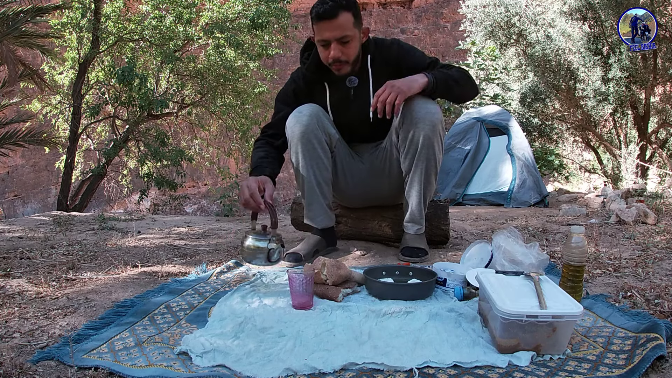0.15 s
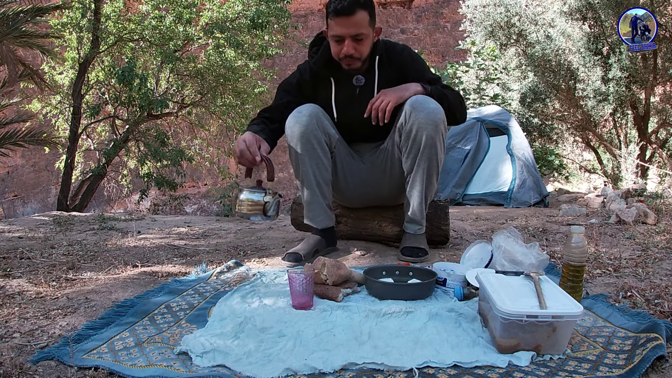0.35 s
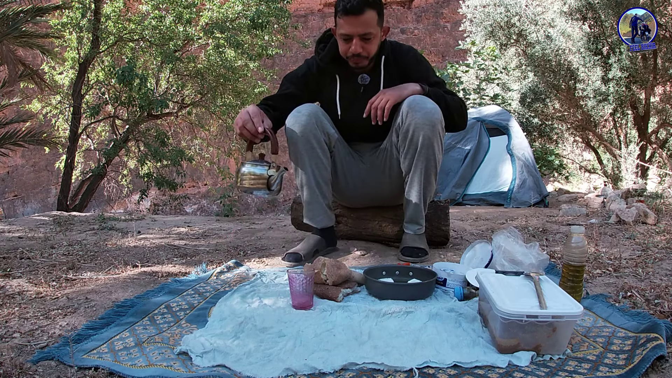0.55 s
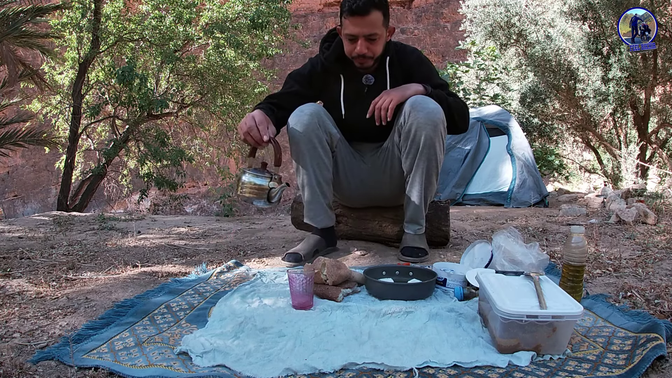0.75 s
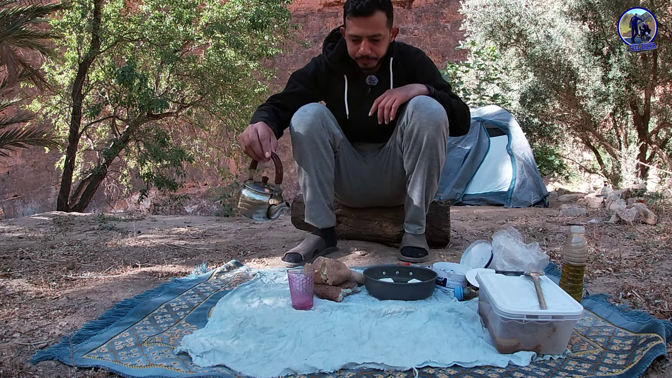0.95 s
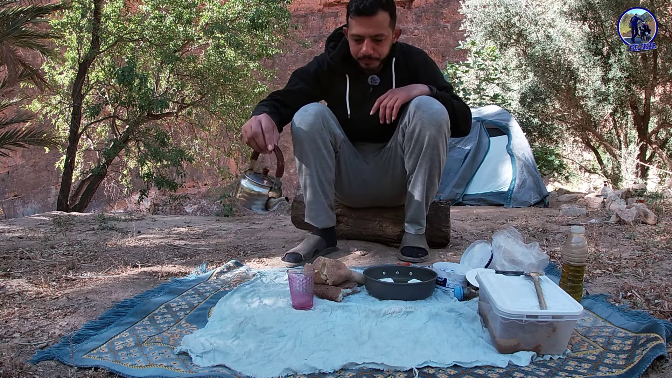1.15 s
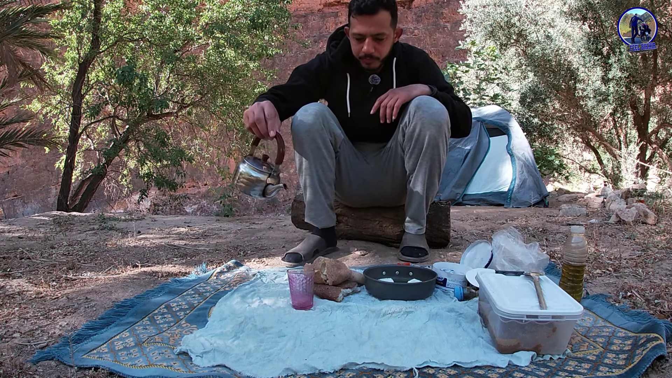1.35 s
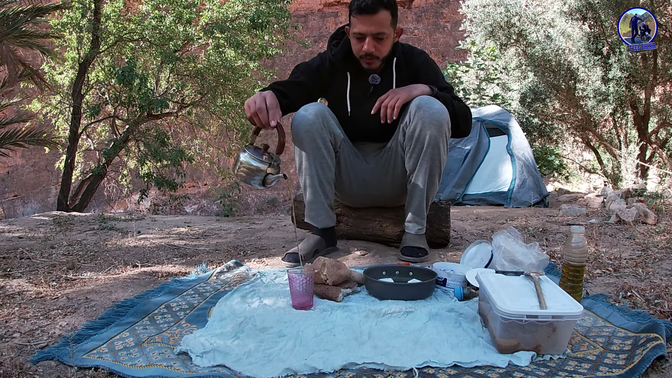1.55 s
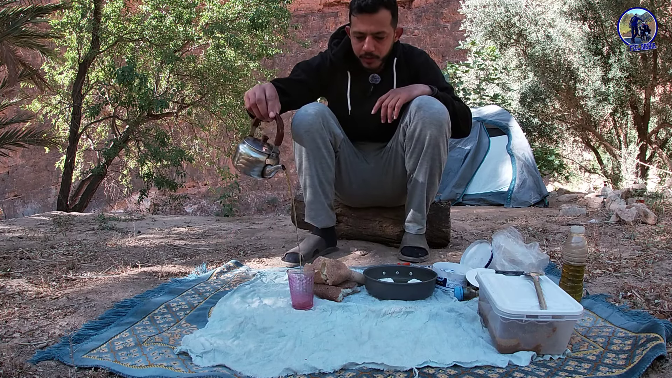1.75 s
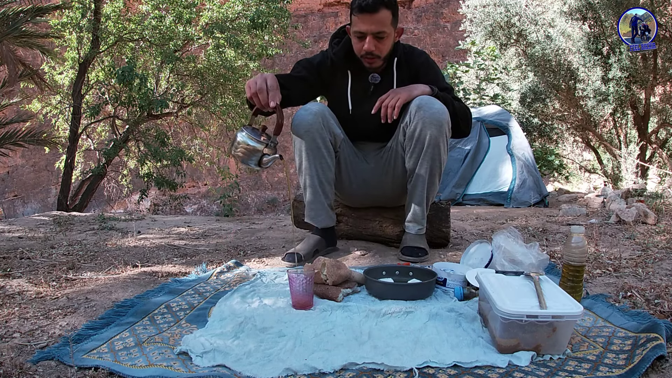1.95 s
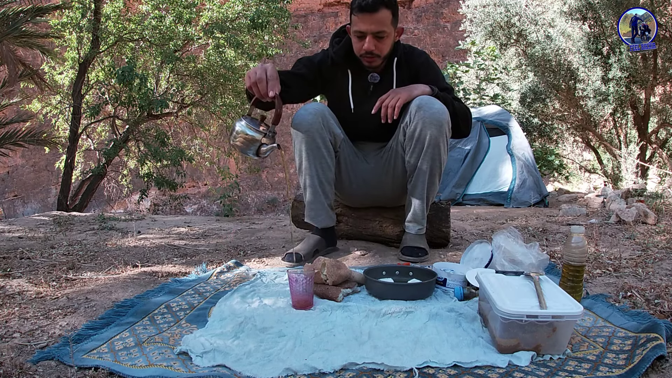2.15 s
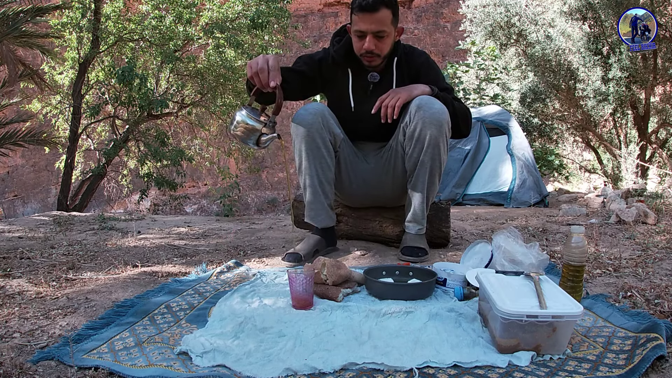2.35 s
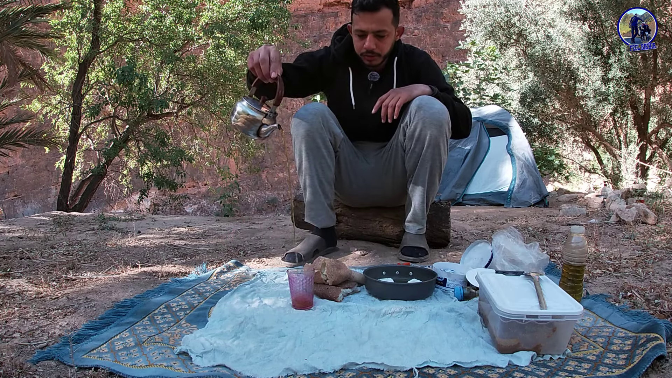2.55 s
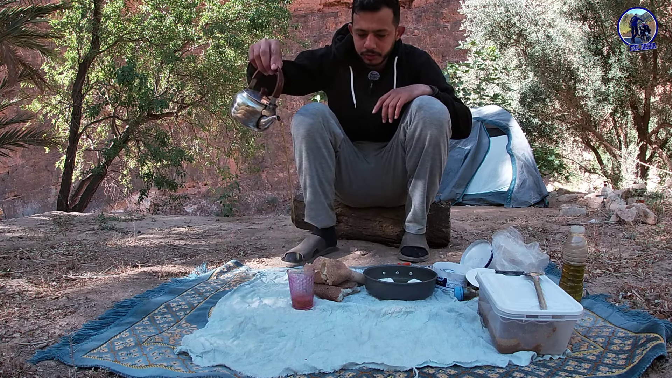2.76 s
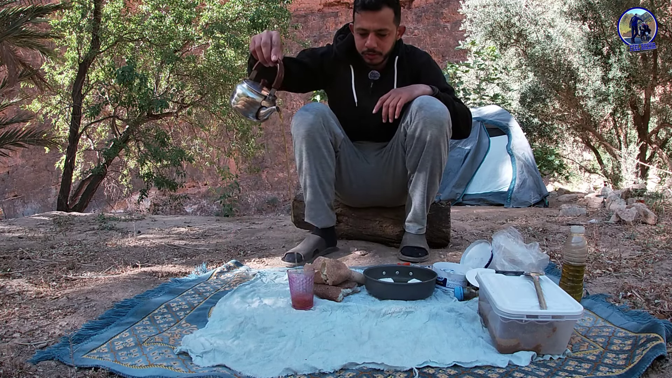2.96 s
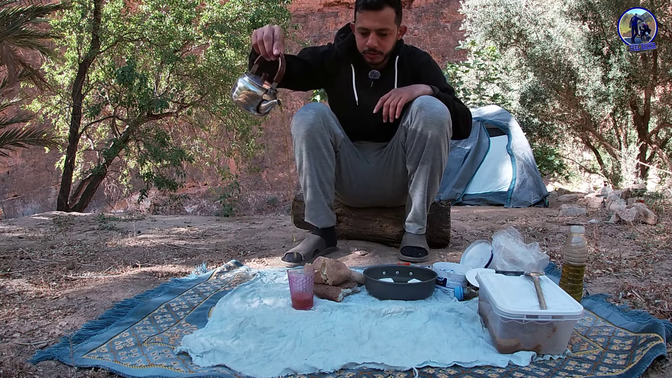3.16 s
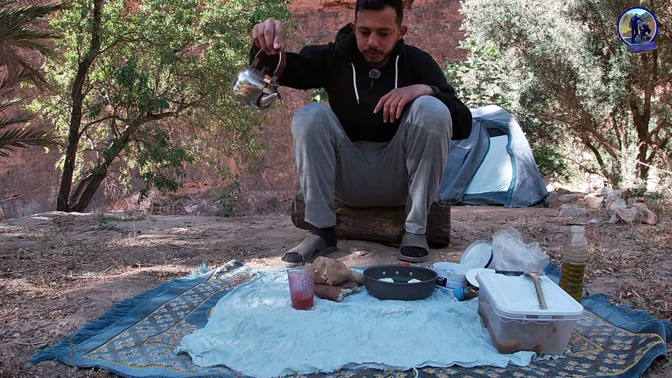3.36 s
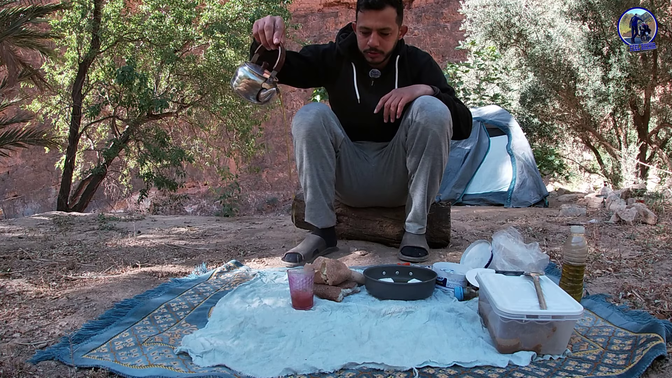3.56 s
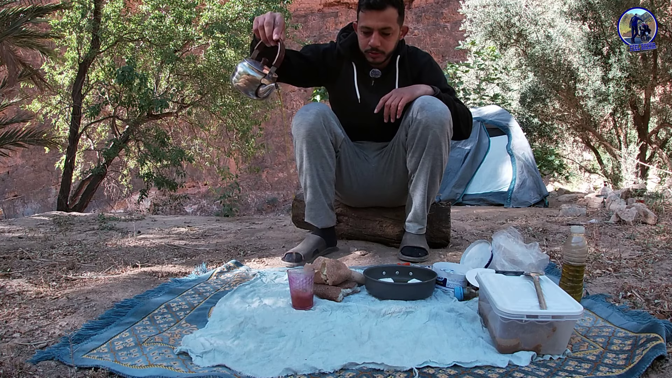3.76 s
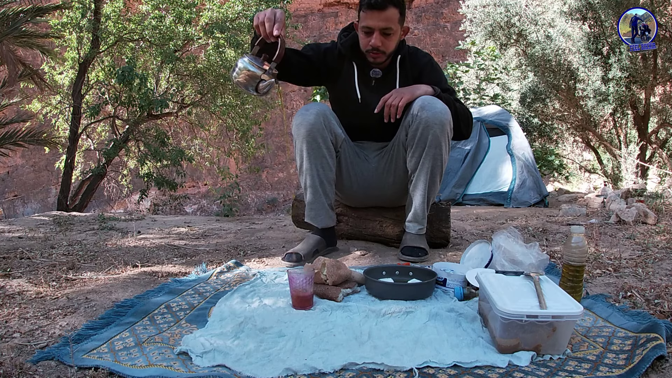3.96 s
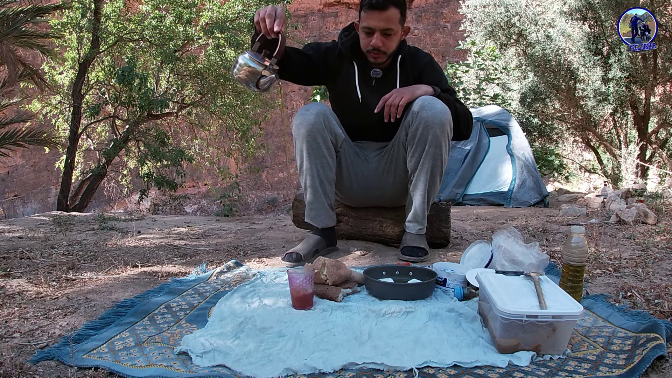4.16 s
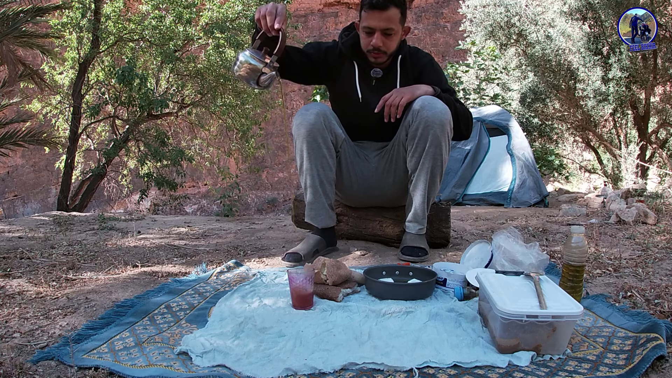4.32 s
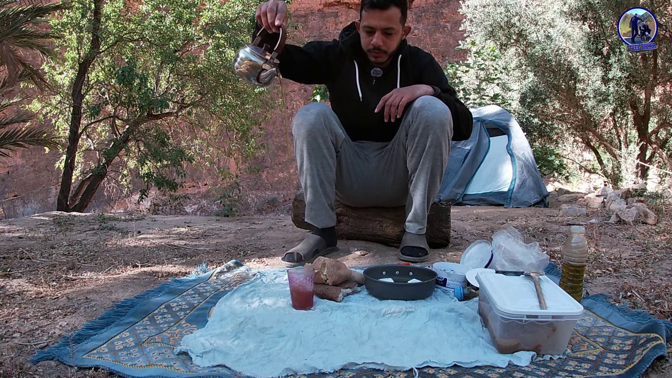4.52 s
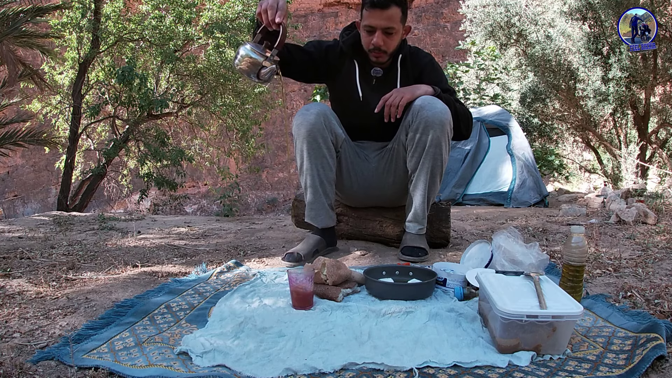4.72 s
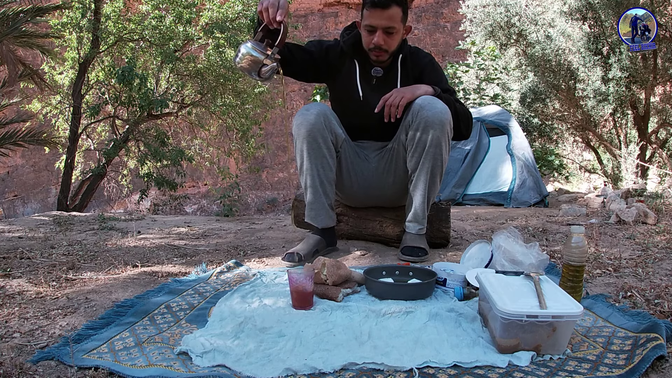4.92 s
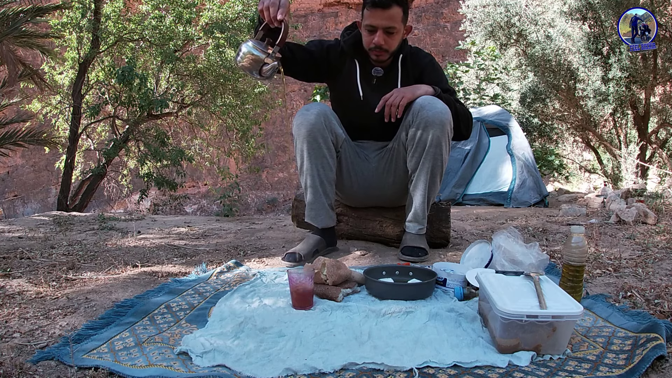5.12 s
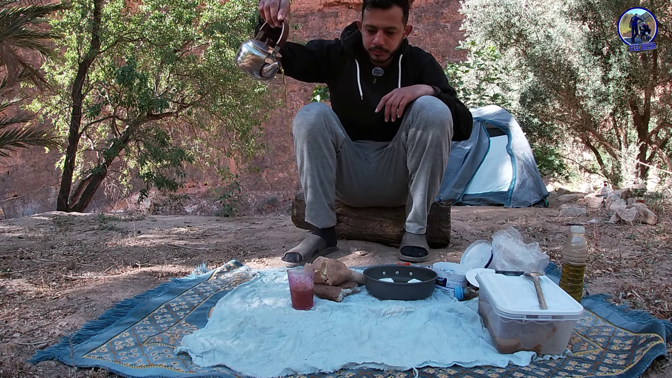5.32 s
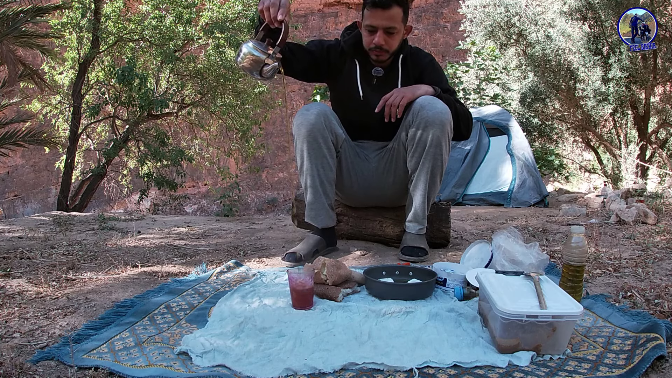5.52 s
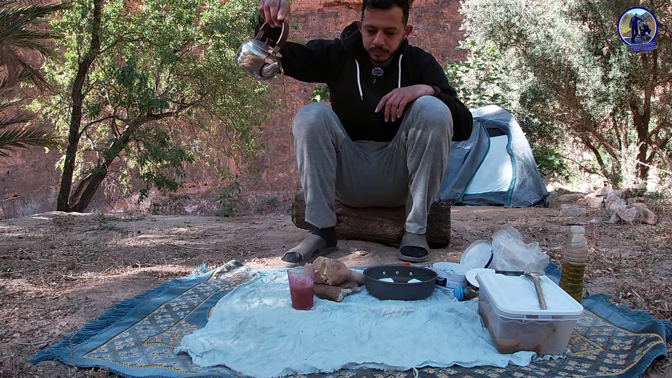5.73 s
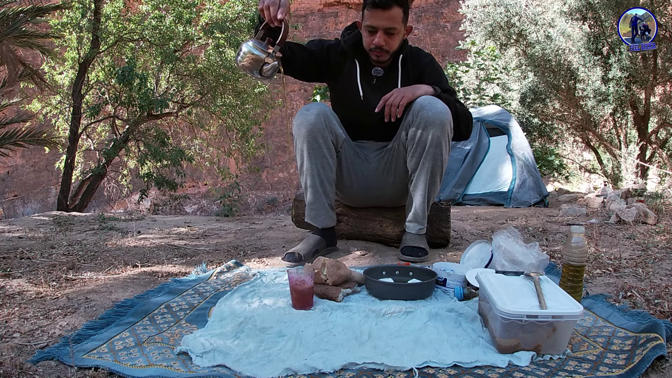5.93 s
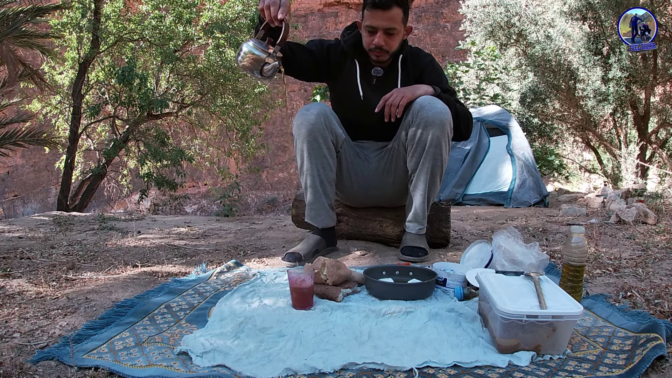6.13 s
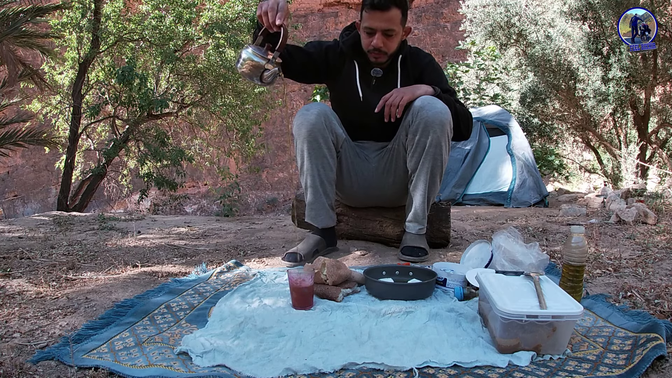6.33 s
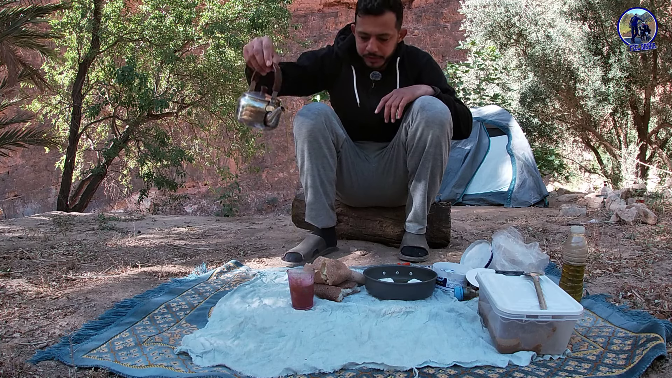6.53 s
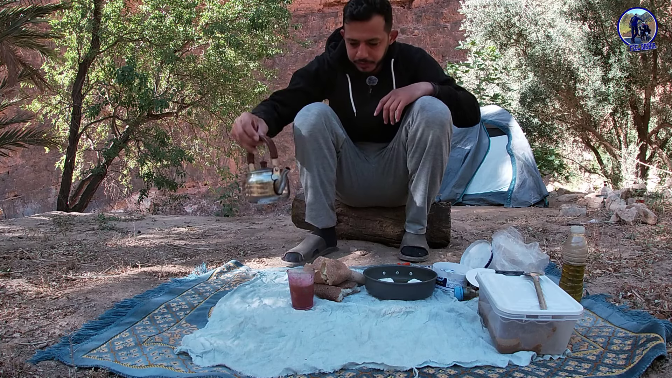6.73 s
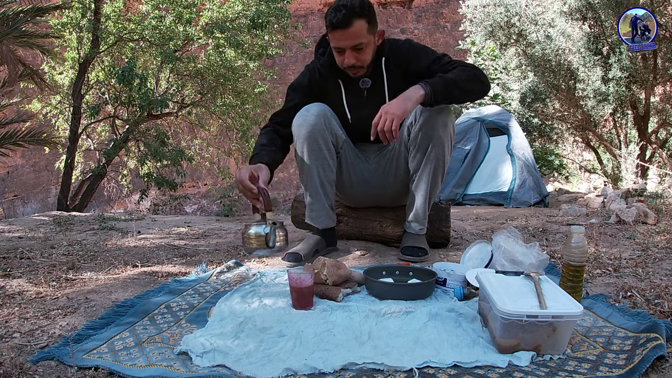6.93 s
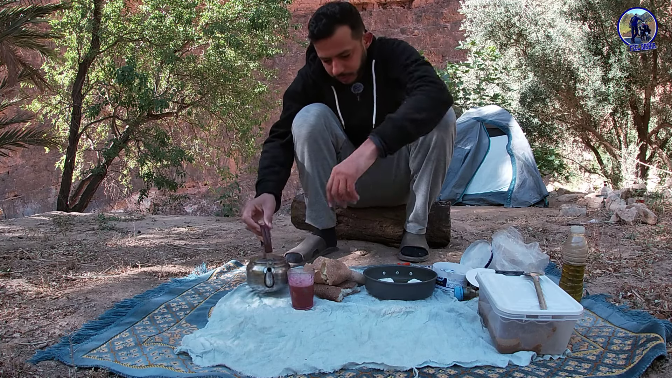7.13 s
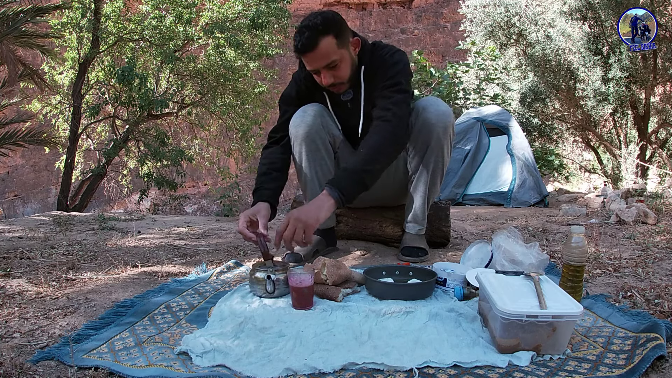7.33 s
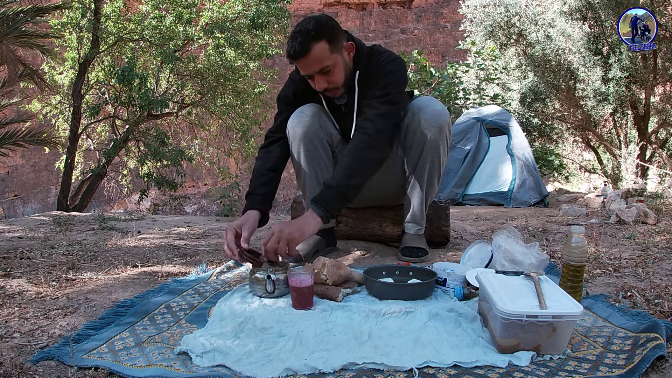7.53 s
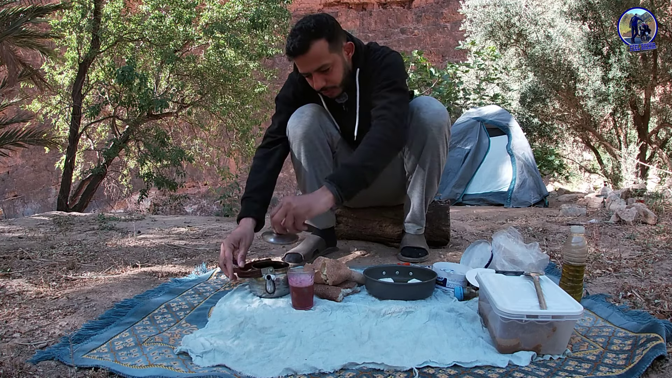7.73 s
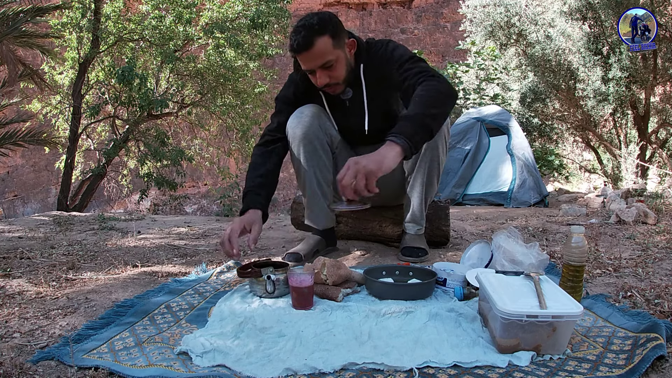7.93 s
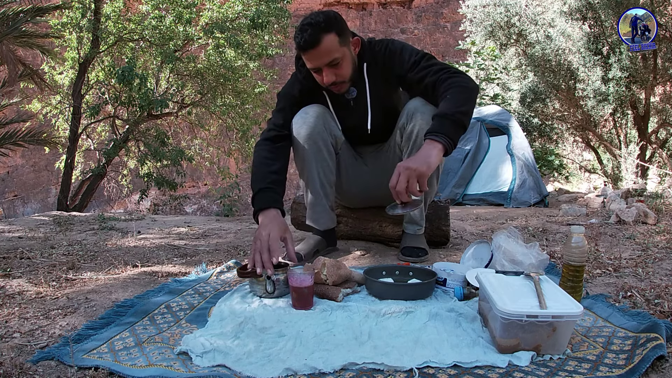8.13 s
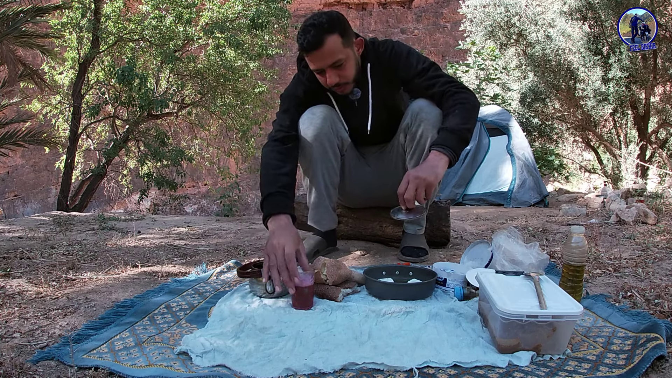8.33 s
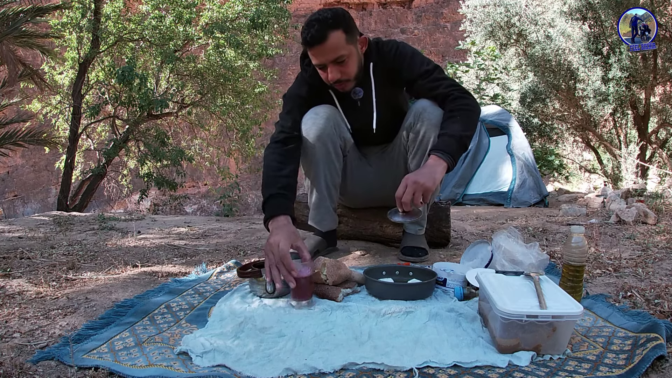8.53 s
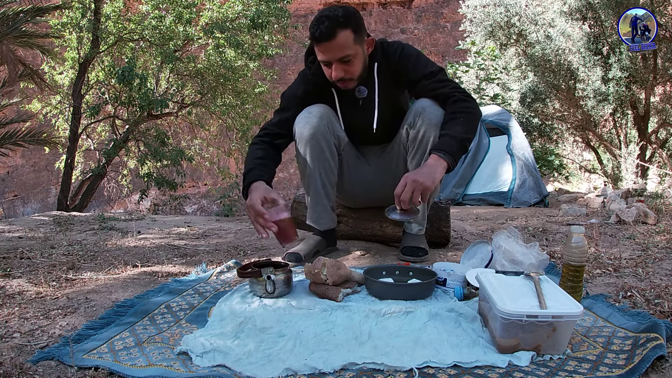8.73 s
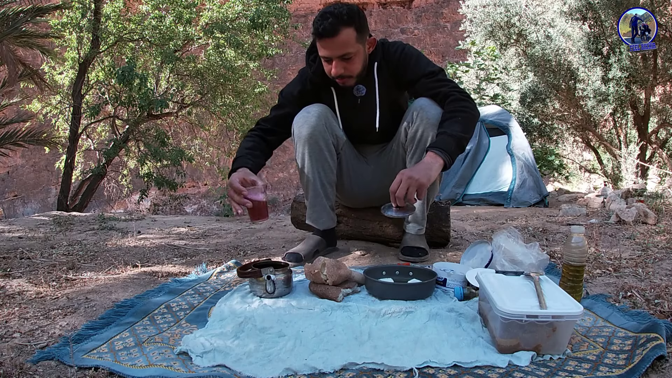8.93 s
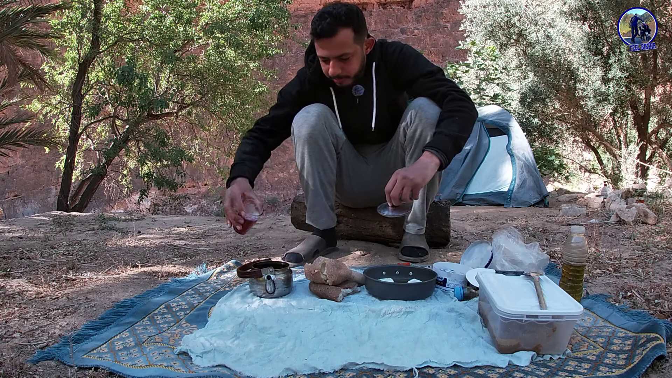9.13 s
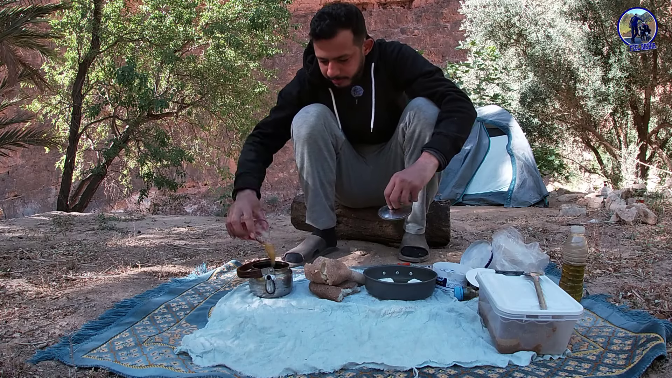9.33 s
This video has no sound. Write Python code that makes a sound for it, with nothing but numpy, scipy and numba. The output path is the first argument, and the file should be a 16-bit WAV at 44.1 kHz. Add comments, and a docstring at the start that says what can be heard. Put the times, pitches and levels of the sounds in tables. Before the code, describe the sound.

Outdoors in a quiet spot, a long, uneven stream of tea spatters and gurgles into a plastic cup, climbing in pitch as it fills. Before the pour, a far bird chirps faintly and the metal teapot gives a few small clicks. After it, the lid clinks twice, sleeves rustle softly and the bird calls again. Faint wind touches the microphone now and then.

```python
"""Quiet open air, with a faint steady ticking in the treble. A distant bird calls and wind puffs while
a metal teapot is raised with small clicks and a rustle of sleeves. From 1.6 s to 7 s tea falls into a
plastic cup on a blanket: the stream breaks into lumps that slap the surface, throw spray, ring the air
in the cup (higher as it fills) and drive bubbles under. Then the lid is lifted off with two rattling
knocks, sleeves rustle and the bird calls again."""
import sys
import numpy as np
from scipy import signal
from scipy.fft import rfft, irfft, next_fast_len
from scipy.io import wavfile
from scipy.ndimage import uniform_filter1d
from numba import njit

SR = 44100
rng = np.random.default_rng(int(sys.argv[2]) if len(sys.argv) > 2 else 0)


def to_wav(s):
    """Save 16-bit WAV."""
    ch = np.atleast_2d(s).T  # columns
    pcm = np.round(np.clip(ch, -1, 1) * 32767)  # PCM
    wavfile.write(sys.argv[1], SR, pcm.astype(np.int16))


N = 418068
TIME = np.arange(N) / SR

# How hard the tea falls (first drips, full stream, thinning end): time_s, flow_db
POUR_FLOW = [(1.6, -49), (1.72, -10.5), (1.85, -27.5), (2.01, -17), (2.05, -23), (2.085, -5.5), (2.3, -3),
             (4.5, 1.5), (6.8, 0.5), (6.87, -5.5), (7.0, -31)]
POUR_START_S, POUR_END_S = POUR_FLOW[0][0], POUR_FLOW[-1][0]
# Lumps of tea that hit the surface: start_s, crack_db, crack_hz, air_ring_db, fine_spray_db
TEA_LUMPS = [(2.034, -31.5, 3150, -66, -59), (2.0588, -30.5, 3460, -66, -39.5),
             (2.0817, -41, 3160, -42, -63), (2.092, -43, 2790, -36, -45), (2.1094, -46, 2980, -31.5, -57),
             (2.117, -35, 2930, -37, -35), (2.142, -49, 2500, -26.5, -56), (2.155, -36, 2500, -36, -45),
             (2.1947, -29, 3480, -48, -33), (2.2103, -22.5, 2970, -56, -47), (2.2204, -35, 4040, -37, -47),
             (2.2363, -31, 2970, -26, -40), (2.2689, -26.5, 2490, -58, -37), (2.28, -30, 3990, -29.5, -44),
             (2.2959, -21.5, 3020, -29.5, -59), (2.3283, -27, 4830, -38, -49),
             (2.343, -25.5, 2980, -41, -36), (2.3697, -36, 3180, -31, -59), (2.397, -31, 3000, -36, -60),
             (2.4041, -34, 4200, -36, -66), (2.4347, -31, 3440, -41, -65), (2.476, -42, 3000, -36, -62),
             (2.5016, -26.5, 3560, -56, -65), (2.5298, -24, 3020, -27, -75), (2.5492, -7.5, 3500, -26, -64),
             (2.586, -21.5, 3250, -20.5, -68), (2.6655, -35, 3440, -29.5, -64),
             (2.708, -28.5, 1960, -30.5, -68), (2.7353, -15.5, 3170, -34, -62),
             (2.7649, -24.5, 1980, -35, -35), (2.785, -28.5, 5260, -46, -48), (2.81, -37, 2200, -31.5, -62),
             (2.824, -25, 2930, -28.5, -62), (2.8464, -37, 2200, -28.5, -57), (2.8634, -31, 3000, -38, -43),
             (2.8761, -23.5, 2860, -35, -58), (2.912, -29.5, 4760, -52, -35),
             (2.93, -23.5, 3040, -31.5, -53), (2.952, -43, 3000, -38, -60), (2.984, -32, 3020, -34.5, -60),
             (3.0052, -46, 2810, -45, -37), (3.024, -48, 3500, -43, -41), (3.032, -35, 3110, -37, -59),
             (3.061, -27.5, 2980, -29, -67), (3.118, -23, 3780, -31, -67), (3.179, -24, 2920, -27.5, -42),
             (3.2058, -23, 2420, -37, -55), (3.2562, -35, 3725, -45, -32.5), (3.306, -25.5, 5060, -36, -60),
             (3.3424, -26.5, 3800, -37, -40), (3.376, -33, 3450, -27, -40), (3.3911, -32, 3430, -44, -42),
             (3.418, -28.5, 4040, -26, -36), (3.501, -46, 1900, -26.5, -65),
             (3.5553, -22.5, 3530, -26.5, -65), (3.5859, -21.5, 3040, -30, -66),
             (3.638, -21.5, 3180, -37, -44), (3.669, -29, 1900, -35, -61), (3.693, -20, 2150, -30, -53),
             (3.708, -19, 3050, -23, -34.5), (3.7764, -28, 5100, -21.5, -36), (3.809, -48, 2800, -27, -58),
             (3.8874, -25.5, 4750, -21.5, -71), (3.922, -27, 2240, -27, -65),
             (4.0128, -24.5, 2340, -28, -38), (4.0685, -33, 2140, -31, -35),
             (4.138, -23.5, 3880, -23.5, -31.5), (4.162, -43, 3000, -54, -39),
             (4.1739, -23, 3220, -26, -60), (4.193, -37, 2060, -29, -55), (4.225, -24, 3900, -36, -38),
             (4.2737, -17, 2620, -34, -43), (4.3455, -31, 4200, -27, -60), (4.355, -28, 3890, -25, -50),
             (4.369, -32, 4560, -32, -49), (4.429, -45, 2150, -28, -50), (4.445, -50, 3830, -27.5, -40),
             (4.4673, -40, 2100, -26.5, -43), (4.509, -45, 3050, -27, -46), (4.6025, -21.5, 2650, -27, -32),
             (4.6243, -38, 2170, -40, -27.5), (4.63, -25, 2170, -29, -51), (4.638, -42, 2030, -18.5, -59),
             (4.652, -15.5, 3110, -53, -54), (4.6673, -15.5, 2800, -35, -46),
             (4.676, -25, 3165, -24.5, -44), (4.7074, -27, 2200, -21, -55), (4.7222, -19, 1950, -32, -63),
             (4.7748, -17, 2820, -29, -29.5), (4.8028, -24, 1860, -25, -60), (4.8238, -22, 2900, -42, -55),
             (4.838, -23, 2880, -48, -26.5), (4.8851, -21.5, 1910, -49, -44), (4.901, -29, 2010, -29, -52),
             (4.9316, -18, 3600, -35, -31), (4.9466, -22.5, 5640, -29, -47), (5.045, -35, 2500, -29, -50),
             (5.0707, -27, 2630, -28, -55), (5.0857, -29, 2430, -32, -35), (5.142, -34, 1920, -26, -38),
             (5.193, -27, 2130, -22.5, -44), (5.2042, -20, 1800, -24, -52), (5.2427, -26, 1980, -23.5, -58),
             (5.273, -29, 2170, -24, -34.5), (5.305, -17, 2320, -43, -57), (5.322, -26, 1900, -28, -52),
             (5.3585, -36, 2700, -24, -62), (5.3787, -21, 2780, -21, -39), (5.422, -25, 2240, -23, -55),
             (5.4437, -21.5, 1870, -21.5, -53), (5.4653, -30, 1970, -30, -40),
             (5.56, -23, 2920, -29.5, -37), (5.583, -22.5, 3030, -22, -45), (5.595, -38, 4720, -45, -27.5),
             (5.6305, -14, 2760, -26.5, -44), (5.722, -39, 1970, -27, -61),
             (5.7592, -29, 1930, -24.5, -29.5), (5.801, -24, 2260, -20, -60),
             (5.8758, -15, 2530, -34, -31.5), (5.903, -22.5, 2010, -27, -56),
             (5.9309, -25.5, 4100, -49, -43), (5.9528, -33, 2080, -49, -32), (5.985, -24.5, 3530, -53, -57),
             (6.072, -25, 2060, -29, -48), (6.085, -24.5, 2930, -44, -39), (6.122, -23, 2650, -30.5, -33.5),
             (6.147, -29, 2140, -29, -47), (6.1799, -11.5, 2580, -18.5, -36),
             (6.267, -23.5, 2850, -27.5, -57), (6.2818, -32, 2100, -35, -33), (6.3144, -28, 2530, -27, -57),
             (6.346, -21.5, 2440, -24, -39), (6.3881, -17, 2580, -29, -32), (6.4086, -31, 2090, -34, -37),
             (6.4557, -25, 2490, -34, -46), (6.515, -29.5, 2100, -37, -45), (6.559, -20, 2400, -53, -37),
             (6.61, -27, 2000, -49, -40), (6.6357, -17.5, 2380, -49, -36), (6.65, -19, 3180, -52, -45.5),
             (6.667, -25, 2760, -43, -39), (6.706, -28, 2130, -32, -49), (6.718, -31, 2980, -34, -63),
             (6.796, -42, 3280, -52, -38), (6.81, -40, 2100, -29.5, -55), (6.828, -26, 2840, -52, -46),
             (6.8423, -34, 1950, -38, -39), (6.874, -30.5, 2060, -45, -47)]


def undb(db):
    """Turns decibels into a gain."""
    return 10 ** (np.asarray(db) / 20)


def level(x, db):
    """Scales a sound to an average (rms) level."""
    return x * undb(db) / np.sqrt(np.mean(x ** 2))


def curve(rows):
    """Joins rows of (time_s, values...) with straight lines, one curve for each value."""
    s, *columns = np.transpose(rows)
    return [np.interp(TIME, s, c) for c in columns]


def colour(x, points):
    """Turns low and high pitches up or down along (pitch_hz, gain_db) points."""
    hz, db = np.transpose(points)
    size = next_fast_len(N)
    bins_hz = np.arange(size // 2 + 1) * SR / size + 1
    gain = undb(np.interp(np.log(bins_hz), np.log(hz), db))
    return irfft(rfft(x, size) * gain, size)[:N]


def band(lo_hz, hi_hz):
    """Noise between two pitches, at an average level of 1."""
    bandpass = signal.butter(2, [lo_hz, hi_hz], "band", fs=SR, output="sos")
    return level(signal.sosfilt(bandpass, rng.standard_normal(N)), 0)


def walk(per_s):
    """Slides to a new random value, of size about 1, per_s times a second."""
    step = int(SR / per_s)
    return uniform_filter1d(np.repeat(rng.standard_normal(N // step + 1), step), step)[:N]


@njit
def ring(out, start, hz, ring_s, size, glide, rise_s):
    """Adds tones that swell, glide up by a share of their pitch and fade by 60 dB over ring_s."""
    for k in range(len(start)):
        n, phase = int(ring_s[k] * SR), 0.
        for i in range(min(n, len(out) - start[k])):
            phase += 2 * np.pi * min(hz[k] * (1 + glide[k] * i / n), .45 * SR) / SR
            swell = 1 - np.exp(-i / (rise_s[k] * SR))
            out[start[k] + i] += size[k] * np.sin(phase) * swell * 1000. ** (-i / n)
    return out


def pings(s, hz, ring_s, db, rise_s, glide=0.):
    """One short fading tone at each start time s."""
    s, hz, ring_s, db, rise_s, glide = (1. * v for v in np.broadcast_arrays(s, hz, ring_s, db, rise_s, glide))
    start = (np.clip(s, 0, 1e3) * SR).astype(np.int64)
    return ring(np.zeros(N), start, hz, np.abs(ring_s) + 1e-4, undb(db), glide, rise_s + 1e-5)


def puffs(s, db, decay_s):
    """A loudness curve that jumps at each start time s and dies away."""
    jumps = np.zeros(N)
    np.add.at(jumps, (np.asarray(s) * SR).astype(int), undb(db))
    return uniform_filter1d(signal.lfilter([1], [1, -np.exp(-1 / (decay_s * SR))], jumps), size=40)


def shower(count, scatter_db, leaders_s):
    """Times, levels and pitch scatter of droplets: 45% trail a leader, the rest fall at random."""
    when, which, lag, chance = rng.random((count, 4)).T
    trailing_s = leaders_s[(which * len(leaders_s)).astype(int)] + 0.00201 - .011 * np.log(lag)
    s = np.where(chance < .45, trailing_s, POUR_START_S + when * (POUR_END_S - POUR_START_S))
    db = scatter_db * np.minimum(rng.exponential(size=count), 2.3)  # few are large
    return s, db, rng.standard_normal(count)


def at(s, values):
    """Reads a curve at the times s."""
    return values[(s * SR).astype(int)]


def outdoors():
    """Open air hushes, wind rumbles on the microphone, something far off drones, electronics whine."""
    # Tone of the open air: pitch_hz, gain_db
    air_tone = [(41, -44), (70, -13.5), (122, -20), (149, -3.5), (244, -7), (334, -11.5), (533, -16),
                (570, -19.5), (610, -12), (797, -8.5), (1360, -17.5), (1860, -15.5), (2840, -17),
                (8120, -23), (12700, -40.5), (13400, -55)]
    # Wind and far drone over time: time_s, rumble_db, drone_db
    wind_levels = [(0.0, -84, -78), (0.5, -89, -85), (0.63, -65, -61.5), (2.88, -82, -73),
                   (5.41, -83.5, -55), (9.08, -78, -89), (9.48, -86, -68)]
    # Thin tones of camera electronics: pitch_hz, level_db
    whine_tones = [(12000, -84), (13500, -97)]
    hush = level(colour(rng.standard_normal(N), air_tone), db=-61.5) * undb(0.055 * walk(1.37))
    rumble_db, drone_db = curve(wind_levels)
    rumble = band(19, 48) * undb(rumble_db + 2.5 * walk(7.4))
    drone = band(140, 200) * undb(drone_db - 7 + 2.7 * walk(8.7))
    whine = sum(undb(db) * np.sin(2 * np.pi * hz * TIME) for hz, db in whine_tones)
    return hush + rumble + drone + whine


def ticking(per_s=30):
    """A faint treble tick, nearly regular, uneven in size."""
    timing, size = rng.standard_normal((int(N / SR * per_s), 2)).T
    s = (np.arange(len(timing)) + .55) / per_s + 0.003 * timing
    return band(6700, 8200) * puffs(s, -57.5 + 2.5 * size, decay_s=.003)


def pot_handling():
    """The handle and lid creak as the pot is raised, each a ping over a rasp; two dull bumps follow."""
    # Small clicks of the handle and lid: start_s, level_db, pitch_hz
    clicks = [(0.0187, -42, 5640), (0.172, -54, 5900), (0.821, -40.5, 3220), (1.06, -44.5, 2360),
              (1.189, -45.5, 5800), (1.3149, -44, 5300), (1.4466, -50, 4470), (1.58, -42, 2200),
              (1.718, -45, 4150), (1.8504, -46, 5800)]
    # Tea slops in the pot, later a soft thump on the blanket: start_s, level_db, pitch_hz
    bumps = [(1.095, -46, 780), (7.757, -54, 60)]
    s, db, hz = np.transpose(clicks)
    creaks = pings(s, hz, 0.0055, db + 4, rise_s=0.00076)
    rasp = band(840, 5700) * puffs(s, db - 12.5, decay_s=0.023)
    s, db, hz = np.transpose(bumps)
    return creaks + rasp + pings(s, hz, 1.4 / np.sqrt(hz), db, rise_s=0.00025)


def bird():
    """Distant whistles drop quickly and turn up at the end; the trees hold each one a moment."""
    # Bird calls: lowest_note_s, lowest_hz, fall_hz_per_s, fall_s, level_db
    calls = [(.205, 3650, 9000, 0.049, -61), (8.93, 3650, 15000, 0.037, -62)]
    rise_hz_per_s, waver_hz, swell_s, fade_s, echo_s = 4500, 90, 0.02, 0.037, 0.15
    whistles = 0
    for s, hz, fall_hz_per_s, fall_s, db in calls:
        t = np.clip(TIME - s, -.3, .3)
        pitch = hz + np.where(t < 0, -fall_hz_per_s, rise_hz_per_s) * t + waver_hz * walk(250)
        swell = np.exp(-np.clip(t, 0, 1) / fade_s - np.clip(-t - fall_s, 0, 1) / swell_s) * (abs(t) < .3)
        whistles += swell * undb(db) * np.sin(2 * np.pi * np.cumsum(pitch) / SR)
    trees = np.exp(-np.arange(20000) / (echo_s * SR)) * rng.standard_normal(20000)
    return whistles + undb(-36) * signal.fftconvolve(whistles, trees)[:N]


def rustle():
    """Cloth rubs with a thin hiss and a duller scuff that swell and fade."""
    # Sleeve and hands moving: middle_s, length_s, hiss_db, scuff_db
    moves = [(1.4, 0.33, -68, -72), (1.66, 0.23, -67, -63.5), (7.769, 0.068, -77, -54),
             (7.915, 0.4, -62, -66), (8.283, 0.51, -61.5, -63), (8.68, .2, -65.5, -73)]
    hiss = band(3840, 5300) * undb(1.4 * walk(82))
    scuff = band(1040, 2400) * undb(1.3 * walk(81))
    out = 0
    for middle_s, length_s, hiss_db, scuff_db in moves:
        swell = np.cos(np.pi * np.clip((TIME - middle_s) / length_s, -.5, .5))
        out += swell * (undb(hiss_db) * hiss + undb(scuff_db) * scuff)
    return out


def pour():
    """Everything that the falling tea does, heard through the cup wall and over the ground."""
    # How the cup wall and the ground shape the tone: pitch_hz, gain_db
    cup_tone = [(100, -42), (150, -12.5), (220, -6.5), (330, 0.5), (560, 0.5), (650, -3), (770, 8),
                (900, 5), (1200, 3.5), (1600, 2.5), (1800, -6), (2200, -4.5), (2600, -8.5), (3200, -2.5),
                (4600, 3), (5700, 3.5), (6400, -2), (7000, 1.5), (9500, -2.5), (12700, -1.5), (13500, -14)]
    flow_db, = curve(POUR_FLOW)
    poured_s = np.clip(TIME - POUR_START_S, 0, POUR_END_S - POUR_START_S)
    tea = cup_air(flow_db, poured_s) + sizzle(flow_db, poured_s) + slaps() + bubbles(flow_db)
    return colour(tea + spray(flow_db, poured_s), cup_tone)


def cup_air(flow_db, poured_s):
    """Drops and lumps ring the air in the cup; as it fills, the ring gets higher, briefer and vaguer."""
    empty_hz, rise_hz_per_s = 1089.5, 111.6
    air_hz = empty_hz + rise_hz_per_s * poured_s
    hum_db = -38 + 0.75 * flow_db - 0.85 * poured_s  # follows the flow only in part: even drips ring
    s, _, _, db, _ = np.transpose(TEA_LUMPS)
    plink_scatter, thump_scatter = rng.standard_normal((len(s), 2)).T
    fill = np.log2(at(s, air_hz) / 1000)  # octaves above 1000 Hz
    hz = at(s, air_hz) * np.exp(0.059 * fill * plink_scatter)
    plinks = pings(s, hz, .04 - 0.053 * fill, db + 6 - 3.8 * fill, rise_s=0.0019)
    hz = 1200 * np.exp(0.08 * thump_scatter)
    thumps = pings(s, hz, 0.009, db - 0.5 + 12 * fill, rise_s=0.0016, glide=0.45)
    s, db, scatter = shower(count=3000, scatter_db=8, leaders_s=s)
    fill = np.log2(at(s, air_hz) / 1000)
    hz = at(s, air_hz) * np.exp((0.023 + 0.24 * fill) * scatter - 0.16 * fill)
    hum = pings(s, hz, .026 - 0.016 * fill, at(s, hum_db) + db - 16, rise_s=0.00058)
    return plinks + thumps + hum


def spray(flow_db, poured_s):
    """Droplets burst in puffs of hiss; some trap a bead of air that chirps; the finest make a mist."""
    # Tone of the bursting droplets: pitch_hz, gain_db
    fizz_tone = [(1000, -70), (1700, -11), (1820, 38.5), (2050, 39.5), (2760, 42), (3020, 38.5), (5400, 20),
                 (6330, -5), (6850, -13), (9010, 16), (10000, -22), (12300, -16), (14000, -75)]
    # Beads of air that sing longer: start_s, level_db, pitch_hz, ring_s
    chirps = [(2.172, -28, 1930, 0.045), (2.24, -42, 4800, 0.1), (2.261, -37, 3760, 0.13)]
    lumps_s = np.array(TEA_LUMPS)[:, 0]
    spray_db = -40.5 + 1.4 * flow_db  # drips throw hardly any spray
    s, db, _ = shower(count=1500, scatter_db=11, leaders_s=lumps_s)
    hiss = level(colour(rng.standard_normal(N), fizz_tone), 0)
    bursts = puffs(s, at(s, spray_db) + db - 13.5, decay_s=0.00073)
    flicker = undb(spray_db - 14.5 + walk(45) + 4 * walk(220))
    s, db, scatter = shower(count=1400, scatter_db=10, leaders_s=lumps_s)
    hz = np.clip(3500 * np.exp(0.33 * scatter - 0.078 * (s - POUR_START_S)), 1400, 10000)
    beads = pings(s, hz, 22 / hz, at(s, spray_db) + db - 13.5, rise_s=0.0005, glide=0.2)
    s, db, hz, ring_s = np.transpose(chirps)
    beads += pings(s, hz, ring_s, db, rise_s=0.0052, glide=0.27)
    not_pouring = (TIME < POUR_START_S) | (TIME > POUR_END_S)
    mist_db = -65.5 + 0.26 * flow_db + 0.36 * poured_s - 30 * not_pouring
    mist = band(2900, 8100) * undb(mist_db + 8.5 * walk(150) + 3 * walk(25))
    return hiss * (bursts + flicker) + beads + mist


def sizzle(flow_db, poured_s):
    """The very finest spray sizzles unevenly and grows as the pot is held higher."""
    s, db, _ = shower(count=900, scatter_db=7, leaders_s=np.array(TEA_LUMPS)[:, 0])
    specks = band(9300, 9400) * puffs(s, db, decay_s=0.00079)
    return specks * undb(-81 + flow_db + 3.5 * poured_s + 3 * walk(25))


def slaps():
    """Each lump snaps on the surface, cracks in a quick burst of pings and throws fine spray."""
    s, crack_db, crack_hz, _, fine_db = np.transpose(TEA_LUMPS)
    poured_s = s - POUR_START_S
    out = pings(s, crack_hz, 13 / crack_hz, crack_db + 7, rise_s=0.00039, glide=0.018)
    out += pings(s, 0.96 * crack_hz, 5.7 / crack_hz, crack_db, rise_s=0.0003)
    sparkle_db = fine_db - 13.5 - poured_s  # fades as foam builds
    out += band(9200, 13800) * puffs(s, sparkle_db, decay_s=0.0013)
    fine_hz = 7560 + 260 * poured_s  # sharpens as the fall gets longer
    for k in range(1, 5):
        timing, scatter, size = rng.standard_normal((len(s), 3)).T
        late_s = s + k * 0.00082 * np.exp(0.3 * timing)
        hz = crack_hz * np.exp(0.22 * scatter)
        db = crack_db - 5 - 1.65 * k + 3 * np.clip(size, -2, 1)
        out += pings(late_s, hz, 32.4 / hz, db, rise_s=0.00027)
        hz = fine_hz * np.exp(0.11 * np.clip(size, -1, 2))
        out += pings(late_s - .0012, hz, 0.0037, fine_db + 11 - 2.28 * k, rise_s=0.00073)
    return out


def bubbles(flow_db):
    """Large bubbles plop and rise in pitch as they near the surface; a crowd of small ones blurs them."""
    # Large bubbles driven under: start_s, level_db, pitch_hz
    large_bubbles = [(2.37, -28.5, 835), (2.396, -33.5, 776), (2.64, -27.5, 520), (2.67, -26.5, 664),
                     (2.696, -31, 660), (2.734, -25, 720), (2.766, -29, 532), (2.811, -24.5, 530),
                     (2.844, -26, 710), (2.874, -31, 560), (2.964, -28, 522), (3.003, -24, 564),
                     (3.033, -26.5, 693), (3.097, -28, 730), (3.178, -21.5, 670), (3.258, -25, 673),
                     (3.306, -24, 535), (3.344, -20.5, 500), (3.39, -29.5, 464), (3.415, -29.5, 820),
                     (3.456, -29.5, 430), (3.473, -27.5, 577), (3.493, -29.5, 540), (3.536, -24.5, 613),
                     (3.562, -27.5, 472), (3.585, -30, 530), (3.708, -24.5, 430), (3.777, -21.5, 640),
                     (3.847, -31, 498), (3.882, -29.5, 520), (3.905, -27.5, 435), (4.01, -27, 313),
                     (4.138, -26, 533), (4.174, -30.5, 448), (4.21, -39, 530), (4.224, -29.5, 494),
                     (4.244, -27.5, 770), (4.295, -27.5, 760), (4.393, -23.5, 454), (4.427, -27.5, 580),
                     (4.54, -27.5, 740), (4.63, -29.5, 336), (4.675, -23.5, 835), (4.839, -29, 333),
                     (4.901, -29, 475), (4.989, -28.5, 720), (5.042, -32.5, 830), (5.095, -26, 288),
                     (5.2, -32.5, 447), (5.262, -30.5, 463), (5.306, -34, 386), (5.34, -34, 320),
                     (5.379, -24, 350), (5.514, -30.5, 310), (5.689, -25.5, 495), (5.749, -25.5, 438),
                     (5.8, -27, 526), (5.818, -33, 294), (5.939, -29.5, 370), (6.073, -29.5, 307),
                     (6.14, -24.5, 329), (6.214, -29.5, 476), (6.261, -33, 340), (6.281, -31.5, 735),
                     (6.345, -22.5, 318), (6.548, -30.5, 370), (6.568, -24, 287), (6.605, -29.5, 360),
                     (6.635, -29.5, 342), (6.706, -28, 380), (6.739, -29, 437), (6.834, -36, 452)]
    s, db, hz = np.transpose(large_bubbles)
    gulps = pings(s, 0.924 * hz, 34 / hz ** 1.085, db, rise_s=0.0007, glide=hz / 900)
    plop_hz = 1.74 * hz * np.exp(0.22 * rng.standard_normal(len(s)))
    plops = pings(s, plop_hz, 0.014, db - 1.5, rise_s=0.00054, glide=0.091)
    deep_s, sink_per_s = 2.72, 0.129  # the crowd needs depth, and sounds lower as the cup fills
    crowd_db = -40 + flow_db + 2 * np.log10(np.clip(TIME - deep_s, .01, None)) - 40 * (TIME < deep_s)
    s, db, scatter = shower(count=1800, scatter_db=6.5, leaders_s=s)
    hz = np.clip(566 * np.exp(.33 * np.clip(scatter, -2, 2) - sink_per_s * (s - deep_s)), 170, 1400)
    crowd = pings(s, hz, 15 / hz, at(s, crowd_db) + db - 10.5, rise_s=0.00065, glide=0.65)
    return gulps + plops + crowd


def lid():
    """Each knock rings the thin lid, damped and bent by the fingers, thuds in the pot and scratches."""
    # Lid against pot: start_s, ring_db, thud_db, scratch_db, ring_share (what the fingers leave of ring_s)
    knocks = [(7.357, -50, -38, -42, .6), (7.365, -46, -37.5, -32.5, .7), (7.372, -29, -27, -39, 0.86),
              (7.406, -45, -46, -64, 0.88), (7.42, -49, -38.5, -59, 0.97), (7.631, -60, -42, -65, .6),
              (7.638, -36.5, -31, -44, 0.7), (7.653, -46, -34.5, -48, 0.91), (7.675, -42, -26, -37, 1),
              (7.759, -66, -45.5, -60, .6)]
    # Tones of the metal lid: pitch_hz, level_db, ring_s
    lid_tones = [(2063, -13, 0.13), (2570, -29, 0.03), (3020, -14, 0.12), (3300, -14, 0.082),
                 (3580, -8.5, 0.1), (4200, -19, 0.062), (4530, -3, 0.075), (4760, -4, 0.1),
                 (4870, -1, 0.13), (5120, -9, .1), (5300, -3, 0.093), (5600, -7, 0.04), (5800, -11, 0.075),
                 (6000, -11, 0.11), (7300, -8, 0.062), (7620, -15, 0.04)]
    # Tones of the hollow pot: pitch_hz, level_db, ring_s
    pot_tones = [(356, -5.5, 0.074), (293, -4, 0.021), (169, -17, 0.038), (1060, -15, 0.051),
                 (523, -10, 0.022), (850, -10, 0.034), (1484, -22, 0.058)]
    s, ring_db, thud_db, scratch_db, ring_share = np.transpose(knocks)
    out = 0
    for hz, db, ring_s in lid_tones:
        bend, grip = rng.standard_normal((len(s), 2)).T
        bent_hz = hz * (1 + 0.009 * bend)
        out += pings(s, bent_hz, ring_share * ring_s, ring_db + db + 3 * grip, rise_s=0.00053)
    out += sum(pings(s, hz, ring_s, thud_db + db, rise_s=0.00076) for hz, db, ring_s in pot_tones)
    out += band(980, 7900) * puffs(s, scratch_db, decay_s=0.0079)
    out += band(970, 7400) * puffs(s, scratch_db - 23, decay_s=0.064)
    return colour(out, [(90, -47), (160, 3.5), (8000, -3), (12000, -12)])  # thin metal sheds little bass


def scene():
    """The tea, the pot and their surroundings, in one channel."""
    return (pour() + lid() + pot_handling() + bird() + ticking() + outdoors() + rustle())[None]


def record(dry):
    """The microphone loses the top treble."""
    soft = signal.sosfilt(signal.butter(2, 11000, fs=SR, output="sos"), dry)
    return signal.sosfilt(signal.ellip(8, .2, 70, 14700, fs=SR, output="sos"), soft)


dry = scene()
out = record(dry)
to_wav(out)
```